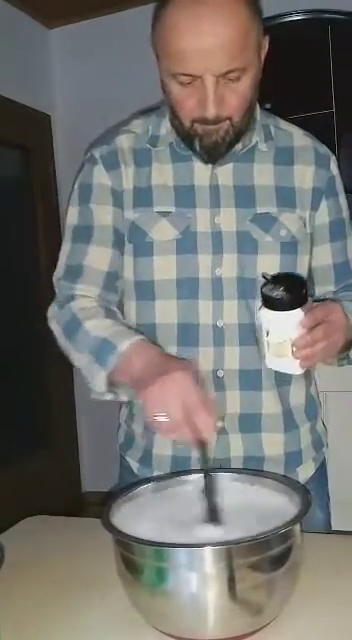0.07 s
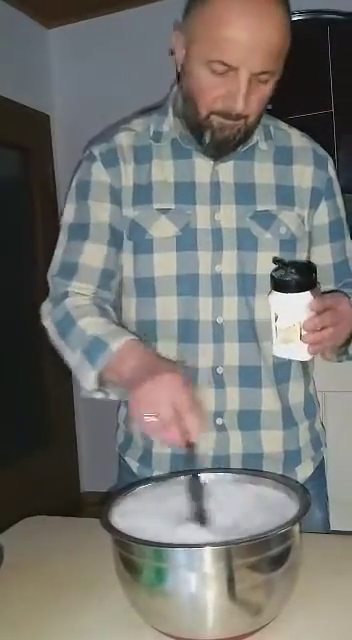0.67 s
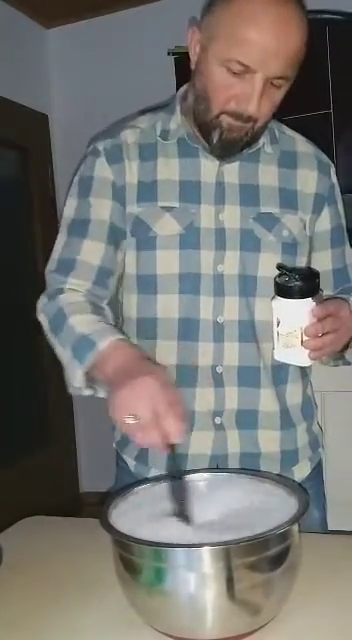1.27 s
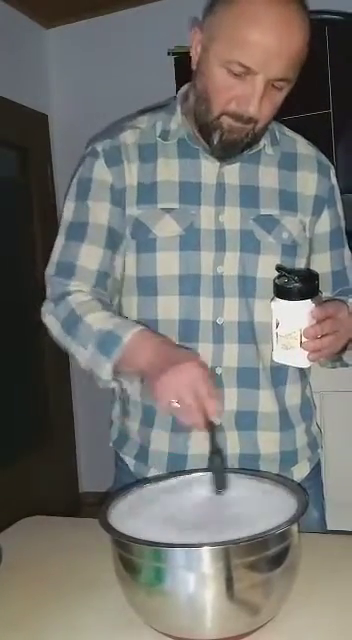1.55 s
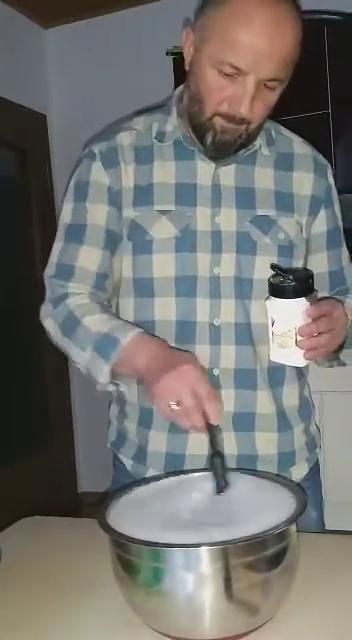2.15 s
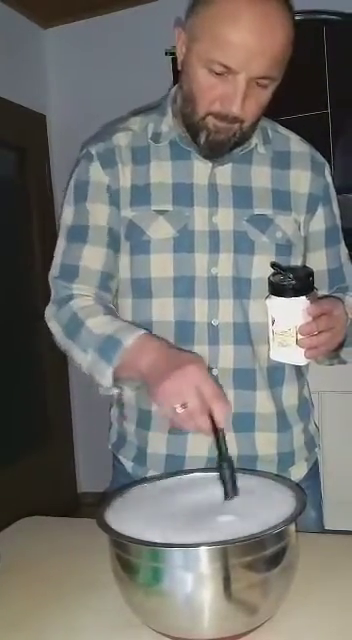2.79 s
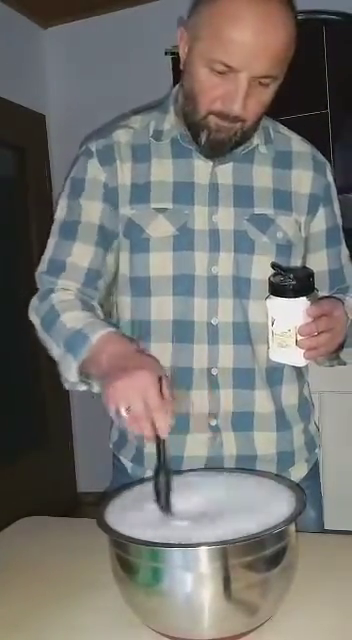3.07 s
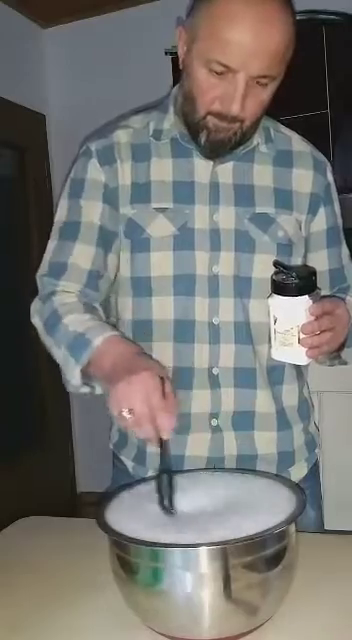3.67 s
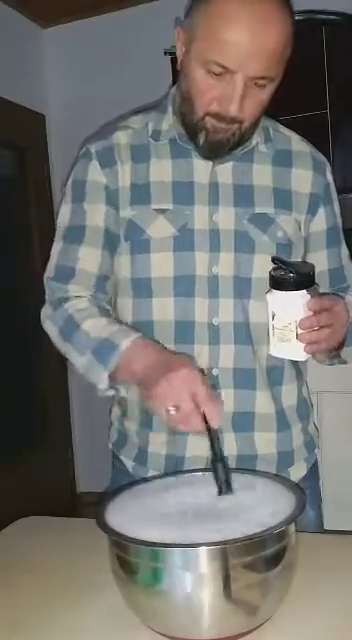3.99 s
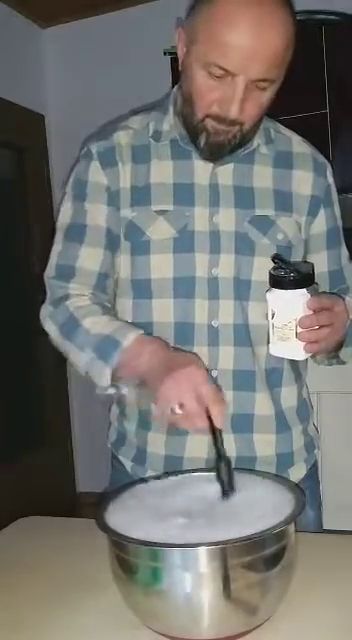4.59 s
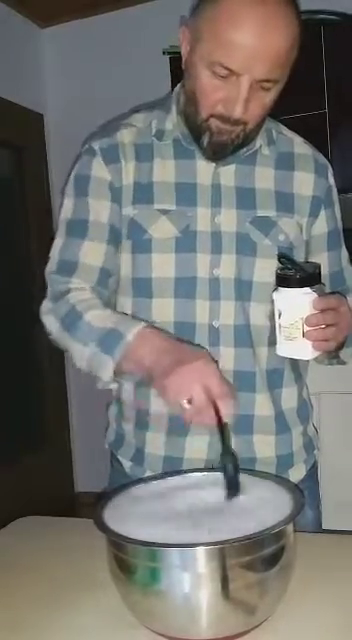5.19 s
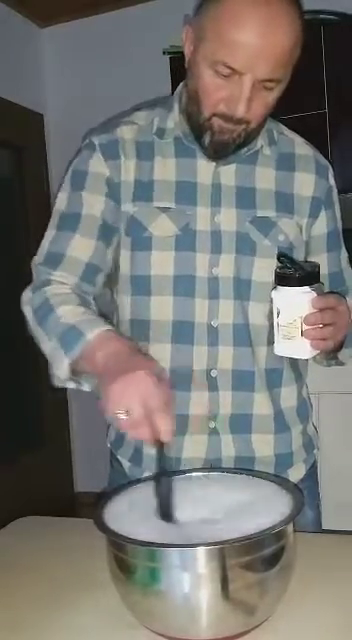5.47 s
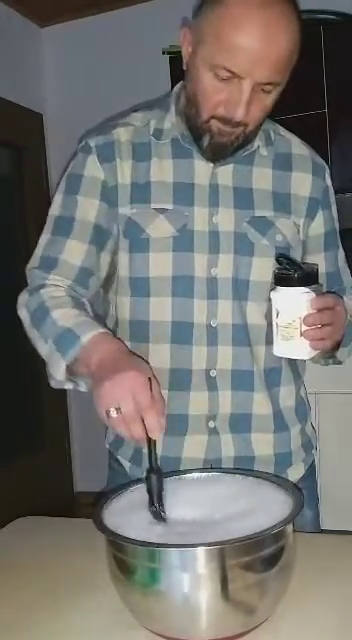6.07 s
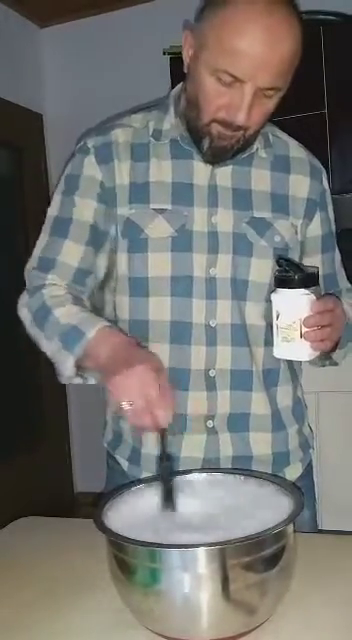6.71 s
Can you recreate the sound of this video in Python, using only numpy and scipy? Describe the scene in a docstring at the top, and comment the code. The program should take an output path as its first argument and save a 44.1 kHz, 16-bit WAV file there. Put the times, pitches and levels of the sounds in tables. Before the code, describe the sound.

Countless tiny bubbles burst in a continuous, airy fizz, heard close up in a quiet kitchen. A spatula circles gently through the liquid in a metal bowl, sloshing and gurgling softly. Little plops and slops cluster at the start, then return now and then with muffled knocks on the bowl. The fizz swells a little as the foam rises, and the sloshing thins toward the end.

```python
"""A kitchen table, where baking soda fizzes in a steel bowl: thousands of tiny bubbles burst each second.
As the foam rises the hiss grows, and coarser bubbles ring the bowl. A plastic spatula stirs round and
round, sloshing the liquid softly, leaving plops of air behind it, now and then bumping the wall and
once squeaking on the steel. A faint room rumble lies underneath."""
import sys
import numpy as np
from scipy import signal
from scipy.fft import rfft, irfft, next_fast_len
from scipy.io import wavfile
from scipy.ndimage import uniform_filter1d, map_coordinates

SR = 44100
rng = np.random.default_rng(int(sys.argv[2]) if len(sys.argv) > 2 else 0)


def generate_wav(signal):
    """Clip the signal to [-1, 1] and save it as 16-bit WAV at the path in sys.argv[1]."""
    frames = np.transpose(np.atleast_2d(signal))
    scaled = np.clip(frames, -1, 1) * 32767
    pcm = np.round(scaled).astype(np.int16)
    wavfile.write(sys.argv[1], SR, pcm)


N = 301644


def fizz():
    """Tiny bubbles burst so densely that they merge into a hiss; a livelier reaction bursts more."""
    # the reaction builds, then levels off: time_s, level_db
    reaction = [(0.0, -51), (1.35, -50.2), (2.2, -49), (3.9, -48.5), (5.4, -48), (6.84, -48.5)]
    # tone of the fizz on the left: freq_hz, gain_db
    left_eq = [(150, -45), (380, -43), (700, -32), (1050, -11), (1900, -6), (2650, -3), (3200, -1),
               (6300, -3), (7150, -2.5), (7750, -5.5), (10000, -6.5), (12600, -4), (14200, -7.5),
               (15700, -11)]
    # and on the right: freq_hz, gain_db
    right_eq = [(150, -38), (380, -19), (700, -9.5), (1200, -11), (2500, -1), (3500, -2), (5100, 0),
                (6600, -4.5), (7350, 0), (10000, -5.5), (11100, -2.5), (13300, -4.5), (15700, -16.5)]
    # a wide image, as most of the sound comes off the steel wall: freq_hz, likeness
    width = [(600, 0.083), (1100, 0.093), (1900, 0.11), (3200, 0.12), (5200, 0.25), (6600, 0.18),
             (9000, 0.15), (13000, 0.14), (15500, .03)]
    right_lead_s = 0.000107  # the sound reaches the right side first
    level_db = automation(reaction)
    crackle = pops(rate=20000 * amp(level_db - level_db.max()), spread_db=3.9)
    # a few bubbles ring for a moment before they burst
    pings = amp(-13) * np.array([bubbles(rate=700, hz=8200, scatter=.3, cycles=45) for _ in range(2)])
    # bubbles this small give out almost no bass
    colour = lambda hz: amp([along(left_eq, hz), along(right_eq, hz)]) * highpass(hz, 650, order=8)
    lag = lambda hz: np.exp(1j * np.pi * hz * right_lead_s * np.array([[-1], [1]]))
    hiss = filtered(stereo(crackle + pings, width), lambda hz: colour(hz) * lag(hz))
    steady = hiss / np.sqrt(uniform_filter1d(np.mean(hiss ** 2, axis=0), SR // 2))
    clustered = clusters(steady, depth_db=.3)
    flurries_db = .22 * wobble(22)
    return clustered * amp(level_db + 3.5 + flurries_db)


def clusters(x, depth_db):
    """Clusters of like-sized bubbles make parts of the spectrum flare briefly."""
    spectrum = signal.stft(x, nperseg=512)[2]
    across_pitch = uniform_filter1d(rng.standard_normal(spectrum.shape[1:]), size=18, axis=0)
    flares = unit(uniform_filter1d(across_pitch, size=14, axis=1))
    return signal.istft(spectrum * amp(depth_db * flares), nperseg=512)[1][:, :N]


def foam():
    """Coarser bubbles ring the bowl; now and then a short, crunchy mid-pitched wash comes through."""
    # activity of the coarse bubbles: time_s, level_db
    activity = [(0, -62), (3.2, -65.5), (5.2, -63), (6.84, -59.5)]
    # resonances of the steel bowl: pitch_hz, width_hz, gain_db
    bowl_modes = [(676, 7.9, -23), (771, 39, -3.5), (937, 40, -2.5), (1216, 27, 0), (1512, 128, -1.5),
                  (1779, 24, 1.5), (1900, 117, 0)]
    # resonances that colour the crunch: pitch_hz, width_hz, gain_db
    crunch_modes = [(770, 290, 0), (1050, 420, -7), (1340, 270, -3)]
    # short, crunchy washes: start_s, length_s, level_db
    crunches = [(1.42, .11, -59), (4.25, .04, -65), (5.11, .06, -54), (5.98, .14, -65)]
    ring = unit(resonate(pops(rate=4000, spread_db=3), bowl_modes)) * amp(automation(activity))
    crunch = unit(resonate(pops(rate=3400, spread_db=10.5), crunch_modes))
    crunch_gain = sum(amp(db) * swell(start, length) for start, length, db in crunches)
    return filtered(ring + crunch * crunch_gain, lambda hz: highpass(hz, 580, order=8))


def stirring():
    """Each sweep sloshes liquid under the bowl's hollow, traps gurgling air and churns deep down."""
    # spatula sweeps, about two a second: start_s, length_s, slosh_db, gurgle_db
    strokes = [(0.007, 0.35, -71, -69), (0.40, 0.18, -73, -78), (0.61, 0.19, -72, -70),
               (0.95, 0.14, -74, -70), (1.2, 0.29, -70.5, -68), (1.74, 0.22, -70, -72),
               (2.29, 0.1, -70, -72), (2.88, 0.24, -70.5, -74), (3.634, 0.1, -72, -77),
               (4.08, 0.38, -69.5, -78), (4.67, 0.19, -68, -74), (4.987, 0.43, -68.5, -79),
               (5.49, 0.15, -68, -73), (5.80, 0.55, -68.5, -76), (6.47, 0.32, -71, -78)]
    # tone of the deep churn: freq_hz, gain_db
    churn_eq = [(20, -28), (40, -3.5), (95, -1.5), (122, -4), (134, 1.5), (160, -3), (200, -3.5),
                (250, -18), (400, -56)]
    swirl_slosh_db, swirl_gurgle_db = -73.5, -87
    sweeps = np.array([sweep(start, length) for start, length, *_ in strokes])
    # between sweeps the liquid circles on and rocks, now lapping, now still
    swirl = amp([[swirl_slosh_db], [swirl_gurgle_db]]) * amp(6 * np.minimum(wobble(9), 1))
    slosh_gain, gurgle_gain = amp(np.transpose(strokes)[2:]) @ sweeps + swirl
    slosh_dip, gurgle_dip, churn_dip = level_dips()
    wash = slosh() * slosh_gain * slosh_dip
    trapped_air = np.array([bubbles(rate=80, hz=322, scatter=0.25, cycles=4.5) for _ in range(2)])
    gurgle = unit(stereo(trapped_air, [(330, 0.28)])) * gurgle_gain * gurgle_dip
    churn = noise_bed(churn_eq, width=[(40, .5), (140, 0.71)]) * churn_dip * amp(-72.5)
    surge = unit(slosh_gain ** .15 * amp(1.5 * wobble(15)))  # the deep motion comes unevenly
    lapping = amp(wobble(22) - 4)
    stray_blips = amp(-80) * bubbles(rate=16, hz=390, scatter=.28, cycles=4) * gurgle_dip
    surface = (wash + gurgle) * lapping + stray_blips
    return surface * pan(right_db=3.5) + churn * surge * pan(right_db=2)


def sweep(start, length):
    """Gain of one sweep: it rises, weakens as the liquid moves with the spatula, then dies away."""
    push_s, drag_db_per_s, settle_t60_s = 0.016, 4.5, 0.45
    t = np.maximum(np.arange(N) / SR - start, 0)
    release_db = 60 * np.maximum(t - length, 0) / settle_t60_s
    return np.minimum(t / push_s, 1) * amp(-drag_db_per_s * t - release_db)


def slosh():
    """Moving liquid rings the air in the bowl; the sound thins out as the foam rises."""
    # resonances of the air above the liquid: pitch_hz, width_hz, gain_db
    hollow_modes = [(455, 8.7, 2), (526, 56, 2.5), (583, 68, 1.5)]
    hollow = resonate(stereo(pops(rate=900, spread_db=2), [(500, 0.47)]), hollow_modes)
    full = unit(filtered(hollow, lambda hz: highpass(hz, 395, order=12)))
    thin = unit(filtered(hollow, lambda hz: highpass(hz, 480, order=12)))
    return full + (thin - full) * np.linspace(0, 1, N) ** 2


def level_dips():
    """Gains of the slosh, the gurgle and the churn: they fall away for a moment, then return."""
    # brief dips where the low sloshing falls away: middle_s, length_s, slosh_db, gurgle_db, churn_db
    dips = [(0.50, 0.10, -2, -10, -16), (0.88, 0.14, -2, -4, -7), (1.60, 0.11, -5, -7, -7),
            (2.21, 0.17, -3, -6, 0), (2.56, 0.08, -20, -16, -3), (2.83, 0.08, -5, -9, 0),
            (3.355, 0.1, -16, -22, -20), (3.575, 0.11, -26, -24, -14), (4.01, 0.13, -12, -24, -7),
            (4.60, 0.10, -4, -16, -3), (4.95, 0.06, -10, 0, 0), (5.23, 0.07, -2, -12, -2),
            (5.41, 0.1, -1, -9, -9), (5.74, 0.13, -5, -22, -3), (6.41, 0.22, -3, -18, -2),
            (6.68, 0.26, -1, -9, 0)]
    return amp(sum(np.outer(dips_db, swell(middle - length / 2, length))
                   for middle, length, *dips_db in dips))


def bumps():
    """The spatula meets the wall: a dull thud through the table and a short slop of liquid."""
    # spatula hits: start_s, level_db, thud_trim_db, splash_trim_db, pitch_hz
    hits = [(0.271, -49, -25, 1, 620), (0.716, -44, -28, -2, 490), (0.768, -48.5, -28, -3, 450),
            (1.322, -49, -16, 0, 430), (1.926, -50, -13, -2, 420), (2.367, -48, -8, -2, 480),
            (2.988, -50, -11, -3, 585), (3.639, -47, -1, 0.5, 500), (3.682, -52, 2, -2, 470),
            (3.83, -53, -25, -2, 600), (4.085, -52, -18, -2, 520), (4.253, -49, -30, 0, 590),
            (4.278, -57, -12, -1, 420), (5.496, -51, -5.5, -1, 540), (5.539, -51, -4, -4, 500)]
    # modes of the full bowl on the table: pitch_hz, gain_db, t60_s
    table_modes = [(109, -10, 0.11), (135, 4.5, 0.25), (155.8, -1.5, 0.6), (197, -2, 0.27),
                   (311, -1.5, 0.12), (364, -3, 0.089)]
    glug_t60_s, splash_t60_s, attack_s = 0.073, 0.097, 0.0018
    out, t = np.zeros(N + SR), np.arange(SR // 2) / SR
    soft_contact = 1 - np.exp(-t / attack_s)
    for start, db, thud_db, splash_db, hz in hits:
        thud = sum(amp(mode_db + rng.normal(0, 0.84) - 60 * t / t60) * np.sin(2 * np.pi * mode_hz * t)
                   for mode_hz, mode_db, t60 in table_modes)
        glug = amp(1.5 - 60 * t / glug_t60_s) * np.sin(2 * np.pi * hz * t)
        band = signal.butter(2, [0.55 * hz, 1.35 * hz], "band", fs=SR, output="sos")
        splash = unit(signal.sosfilt(band, rng.standard_normal(len(t))))
        slop = glug + amp(splash_db - 60 * t / splash_t60_s) * splash
        hit = soft_contact * (amp(-8) * slop + amp(thud_db - 9) * thud)
        out[round(start * SR):][:len(t)] += amp(db) * hit
    return kitchen_reverb(out[:N], wet_db=-7) * pan(right_db=1.5)


def plops():
    """A large bubble closes with a crisp, round note that rises as it nears the surface."""
    # single air bubbles behind the spatula: start_s, level_db, pitch_hz
    notes = [(0.069, -52.5, 530), (0.184, -59, 550), (0.637, -49.5, 490), (0.676, -56, 470),
             (0.752, -55, 530), (0.808, -58, 510), (1.04, -60, 255), (1.79, -61, 490), (4.745, -56, 490),
             (4.822, -52.5, 480), (5.012, -57, 530)]
    attack_s, t60_s, rise_per_s = .0015, .085, 2.5
    out, t = np.zeros(N + SR), np.arange(SR // 4) / SR
    envelope = (1 - np.exp(-t / attack_s)) * amp(-60 * t / t60_s)
    for start, db, hz in notes:
        chirp = np.sin(2 * np.pi * hz * t * (1 + rise_per_s * t / 2))
        out[round(start * SR):][:len(t)] += amp(db) * envelope * chirp
    return kitchen_reverb(out[:N], wet_db=-10) * pan(right_db=2.5)


def squeak():
    """Plastic slides on wet steel with a faint, rough tone."""
    start_s, length_s, pitch_hz = 0.90, 0.17, 865
    phase = 2 * np.pi * np.cumsum(pitch_hz * (1 + .025 * wobble(250))) / SR
    envelope = np.minimum(3 * swell(start_s, length_s), 1)
    return amp(-69 + 1.5 * wobble(60)) * envelope * np.sin(phase)


def kitchen_reverb(x, wet_db):
    """Add the room's short tail, which lingers in the mids and dies fastest in the treble."""
    # the kitchen's decay: freq_hz, t60_s
    decay = [(200, 0.15), (2000, 0.53), (12000, 0.062)]
    hz, t, noise = signal.stft(rng.standard_normal((2, SR // 2)), SR, nperseg=256)
    tail = signal.istft(noise * amp(-60 * t / along(decay, hz)[:, None]), SR, nperseg=256)[1]
    wet = signal.fftconvolve(np.atleast_2d(x), tail / np.linalg.norm(tail[0]), axes=1)
    return x + amp(wet_db) * wet[:, :N]


def room_tone():
    """The kitchen's faint low rumble."""
    # tone of the quiet room: freq_hz, gain_db
    room_eq = [(15, -23), (40, -11), (130, 1), (250, -29), (1000, -34), (8000, -51)]
    return amp(-81.5) * noise_bed(room_eq, width=[(100, 0.17)])


def pops(rate, spread_db):
    """Two streams of pops: clicks of scattered size, rate a second, at random moments."""
    bursts = rng.random((2, N)) < rate / SR
    sizes = amp(spread_db * np.clip(rng.standard_normal((2, N)), -3, 3))
    return unit(bursts * sizes * np.sign(rng.standard_normal((2, N))))


def bubbles(rate, hz, scatter, cycles):
    """Bubbles at random moments and pitches; each rings briefly and rises a little."""
    t = np.arange(int(SR * 6 * cycles / hz)) / SR
    draws = rng.standard_normal((int(rate * N / SR), 2))
    pitch = hz * np.exp(scatter * np.clip(draws[:, :1], -2, 2))
    age = pitch * t / cycles
    envelopes = amp(3 * draws[:, 1:]) * (1 - np.exp(-8 * age)) * np.exp(-age)
    rings = envelopes * np.sin(2 * np.pi * pitch * t * (1 + .02 * age))
    starts = rng.integers(0, N, (len(draws), 1))
    return unit(np.bincount((starts + np.arange(len(t))).ravel(), rings.ravel(), N)[:N])


def noise_bed(eq, width):
    """Steady stereo noise shaped by (freq_hz, gain_db) points."""
    noise = stereo(rng.standard_normal((2, N)), width)
    return unit(filtered(noise, lambda hz: amp(along(eq, hz))))


def stereo(pair, width):
    """Two unrelated signals become left and right, as alike as the (freq_hz, likeness) points say."""
    angle = lambda hz: np.arccos(np.clip(along(width, hz), -1, 1)) / 2
    mid, side = filtered(pair, lambda hz: np.array([np.cos(angle(hz)), np.sin(angle(hz))]))
    return np.array([mid + side, mid - side])


def pan(right_db):
    """Channel gains of a source that is louder on the right."""
    return amp([[-right_db / 2], [right_db / 2]])


def resonate(x, modes):
    """Ring x through (pitch_hz, width_hz, gain_db) resonances with steep skirts."""
    band = lambda hz, pitch, width: 2j * hz * width / (pitch ** 2 - hz ** 2 + 2j * hz * width)
    return filtered(x, lambda hz: sum(amp(db) * band(hz, pitch, width) ** 2 for pitch, width, db in modes))


def filtered(x, response):
    """Filter x by a complex response of frequency."""
    size = next_fast_len(N + SR // 2)
    return irfft(rfft(x, size) * response(np.fft.rfftfreq(size, 1 / SR)), size)[..., :N]


def highpass(hz, edge_hz, order):
    """Gain of a steep low cut."""
    return np.sqrt(1 - 1 / (1 + (hz / edge_hz) ** (2 * order)))


def along(points, hz):
    """Read (freq_hz, value) points on a log frequency axis."""
    freqs, values = np.transpose(points)
    return np.interp(np.log(hz + 1), np.log(freqs + 1), values)


def automation(points):
    """One value per sample from (time_s, value) points."""
    return np.interp(np.arange(N) / SR, *np.transpose(points))


def wobble(rate):
    """A smooth random curve, rate knots a second."""
    return map_coordinates(rng.standard_normal(int(N * rate / SR) + 4), [np.arange(N) * rate / SR])


def swell(start, length):
    """One smooth rise and fall."""
    return np.sin(np.pi * np.clip((np.arange(N) / SR - start) / length, 0, 1))


def amp(db):
    """Decibels to gain."""
    return 10 ** (np.asarray(db) / 20)


def unit(x):
    """Scale to rms 1."""
    return x / np.sqrt(np.mean(x ** 2) + 1e-20)


def scene():
    """The bowl and the quiet kitchen around it."""
    return fizz() + foam() + stirring() + bumps() + plops() + squeak() + room_tone()


def record(dry):
    """A brick-wall high cut takes off the very top of the hiss."""
    top_hz = 15740
    return filtered(dry, lambda hz: hz < top_hz)


dry = scene()
out = record(dry)
generate_wav(out)
```